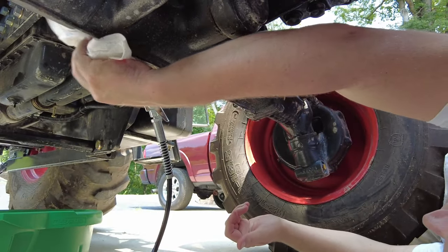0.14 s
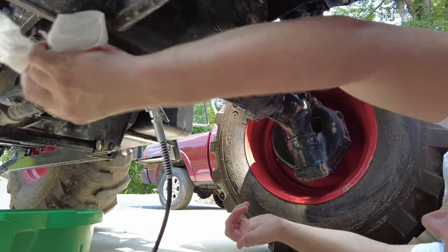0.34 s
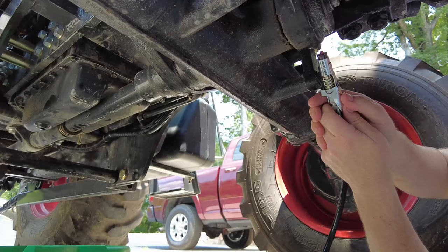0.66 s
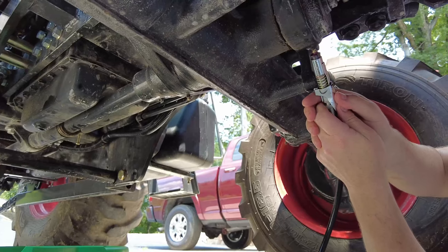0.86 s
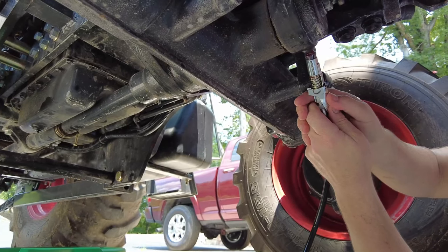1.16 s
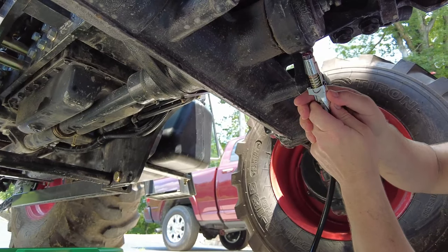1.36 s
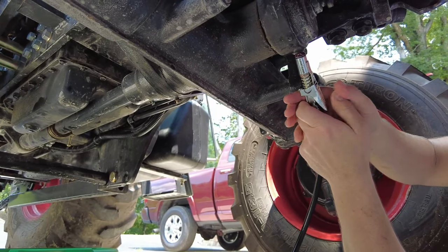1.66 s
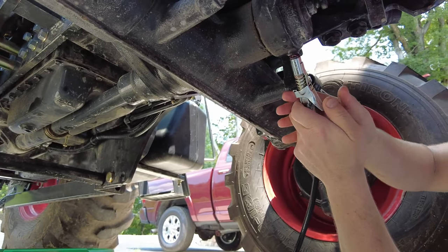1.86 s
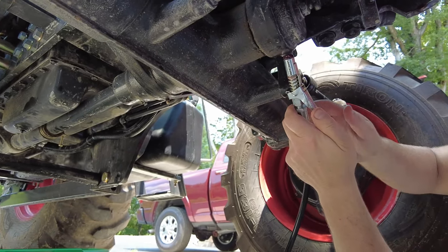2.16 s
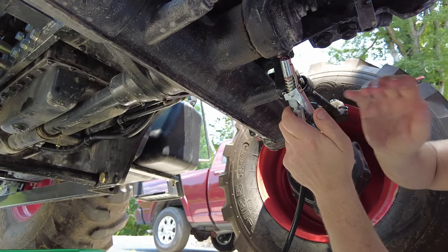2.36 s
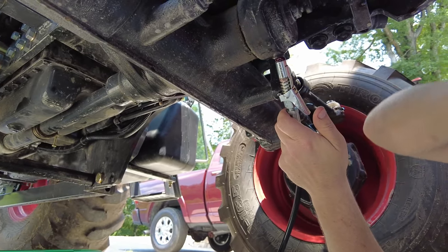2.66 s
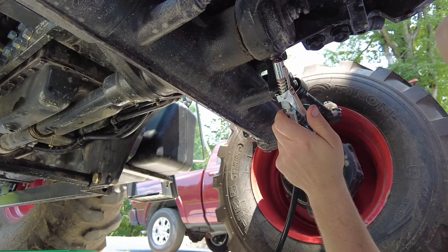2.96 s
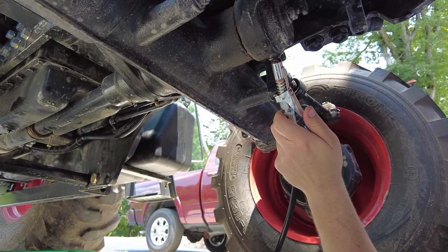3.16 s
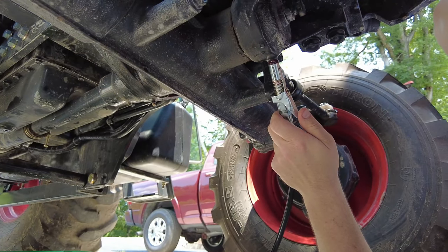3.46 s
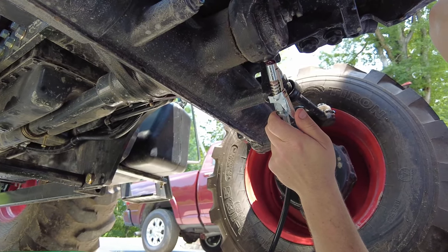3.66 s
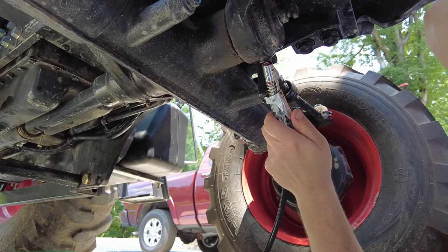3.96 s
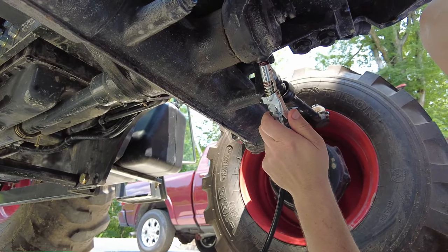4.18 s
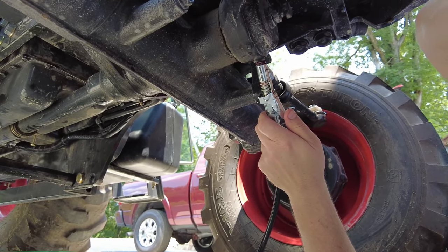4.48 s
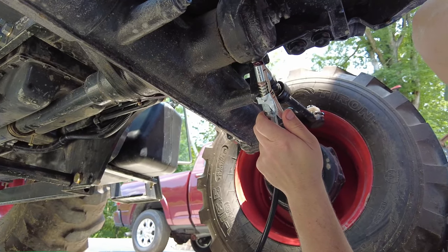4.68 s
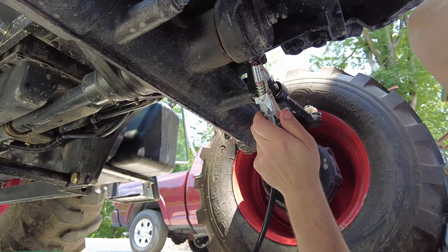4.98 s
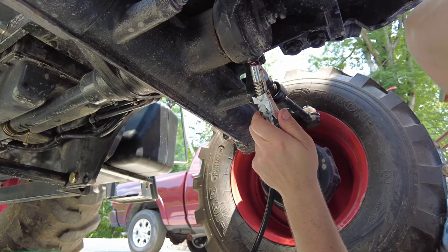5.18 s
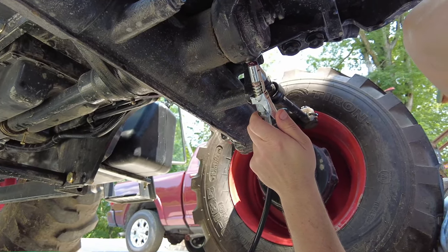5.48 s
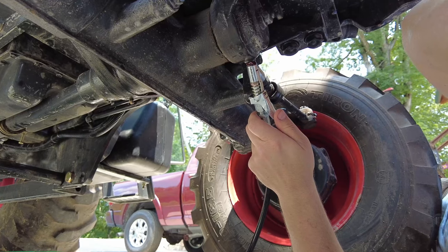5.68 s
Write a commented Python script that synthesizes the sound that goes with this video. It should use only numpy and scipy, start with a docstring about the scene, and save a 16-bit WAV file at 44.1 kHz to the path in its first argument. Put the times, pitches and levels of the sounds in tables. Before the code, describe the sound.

In an open garage with a low, distant rumble, quiet bird chirps and a soft paper wipe give way to small clicks of a steel coupler. Then a trigger clicks and a nearby cordless grease gun whistles and whirs up to speed, knocking lightly as it pumps. The motor coasts down with a brief grinding of gears, and a second pull sends the whine rising again.

```python
"""An open garage, under a tractor, at a microphone with two closely spaced ports. A paper towel wipes the
frame and a bird sings outside; hands snap the coupler of a cordless grease gun onto a nipple. The
trigger is pulled twice: the speed control whistles, the motor winds up and sags under the pump stroke,
coasting down between the pulls. Its whine rides on the rush of gears and fan; the yard rumbles in
the distance."""
import sys
import numpy as np
from scipy import signal
from scipy.fft import rfft, irfft
from scipy.io import wavfile
from scipy.ndimage import uniform_filter1d, map_coordinates

SR = 44100
rng = np.random.default_rng(int(sys.argv[2]) if len(sys.argv) > 2 else 0)


def generate_wav(signal):
    """Clip the signal to [-1, 1] and save it as 16-bit WAV at the path in sys.argv[1]."""
    frames = np.transpose(np.atleast_2d(signal))
    scaled = np.clip(frames, -1, 1) * 32767
    pcm = np.round(scaled).astype(np.int16)
    wavfile.write(sys.argv[1], SR, pcm)


N = 256926
T = np.arange(N) / SR
F = np.maximum(np.arange(N // 2 + 1) * SR / N, 1)

MOTOR_START_S = 3.22
# Motor shaft winding up, coasting, winding up again and sagging under the second pump stroke: t/s, f/Hz
SHAFT_RATE = [(3.22, 5), (3.41, 128), (3.56, 251), (3.68, 318), (3.768, 352.4), (4.51, 354.8), (4.57, 339),
              (4.63, 272), (4.72, 207), (4.85, 166), (5.17, 83), (5.25, 102), (5.4, 197), (5.52, 280),
              (5.64, 326), (5.76, 334), (5.83, 324)]
def motor(first_sag_hz=19.5):
    """The gun under the tractor: its tones and its rush all follow one shaft."""
    hz = curves(SHAFT_RATE)[0] - first_sag_hz * load()
    turns = np.cumsum(hz * (1 + .0005 * walk(40))) / SR
    angle, speed = 2 * np.pi * turns, hz / hz.max()
    rattle = np.clip((1 - speed) / .08, 0, 1)  # the teeth rattle below full speed
    spun_up = np.clip((speed - .3) / .35, 0, 1)  # a slow shaft raises no overtones or growl
    tones = unbalance_hum(angle, speed, rattle)
    tones += gear_mesh(angle, hz, speed, rattle)
    tones += commutator_whine(angle, hz, speed, rattle)
    tones += overtones(angle, hz, speed) * spun_up ** 2
    tones += gearbox_growl(angle, hz, speed, rattle) * np.sqrt(spun_up)
    return tones * gate(MOTOR_START_S, 6) + rush(turns, hz, speed)


def commutator_whine(angle, hz, speed, rattle, bars=12):
    """The commutator bars whine, smothered by the first pump stroke and clearer with the gears slack."""
    roughness_rad = .1 + .55 * rattle * (1 - .75 * slack())
    whine = tone(bars * angle + roughness_rad * walk(110), 1.8 * speed, pan_db=-7.5 * speed ** 8)
    db = -34.8 + resonance(bars * hz, hz=4250, width=90, db=7.7) - 5 * load() + 3 * slack()
    db += (1.5 + 1.5 * rattle) * walk(35)
    return whine * undb(db) * speed ** 1.02 * radiation(bars * hz) * standing_waves(hz)


def gear_mesh(angle, hz, speed, rattle, teeth_per_turn=10.245):
    """Meshing teeth sing; the pump stroke shakes the tone and the overrun makes it flare."""
    mesh_hz = teeth_per_turn * hz
    shake_rad = .1 + .8 * rattle + .54 * load()
    mesh = tone(teeth_per_turn * angle + shake_rad * walk(110), -1.5 - rattle)
    db = -30.5 + resonance(mesh_hz, hz=3406, width=200, db=6) + 20.5 * overrun() - 2 * rattle
    db += 2 * walk(35)
    return mesh * undb(db) * speed ** 2.6 * radiation(mesh_hz) * standing_waves(hz)


def unbalance_hum(angle, speed, rattle):
    """The unbalanced shaft hums once per turn, growing steeply with speed."""
    return tone(angle + .25 * rattle * walk(45), -1.3) * undb(-40.5 + walk(14)) * speed ** 8.8


# Shaft harmonics: multiple of the shaft rate, full-speed level/dB, phase between ports/rad, power of speed
HARMONICS = [(3, -40.5, -1.7, 18), (6, -40, -1.0, 4), (15, -46, 2.5, 6), (24, -38.5, 1.6, 1.8),
             (36, -53, 1, 8), (37, -55, 2, 8), (40, -52, -1, 8), (41, -52, 1.5, 8), (42, -51, 2, 8)]
def overtones(angle, hz, speed):
    """Harmonics of the shaft that sing out near full speed."""
    out = 0
    for multiple, db, spread, power in HARMONICS:
        partial = tone(multiple * angle + .2 * walk(30), spread)
        out += partial * undb(db + 2.2 * walk(18)) * speed ** power * standing_waves(hz)
    return out


# Low gearbox tones: multiple of the shaft rate, base level/dB re the rumble, phase between ports/rad
GROWL_TONES = [(.5, -14, .3), (.68, -15, .3), (1, -11, -.8), (2, -8, 2.4), (2.3, -10, 2.7), (3, -1, -2.7),
               (4, -11, -1.8), (6, -3, -1.6)]
def gearbox_growl(angle, hz, speed, rattle):
    """The loaded gearbox growls through the hollow of its case; the lowest tones swell on the overrun."""
    rumble_db = rush_levels(speed)[0]
    out = 0
    for multiple, db, spread in GROWL_TONES:
        lift_db = resonance(multiple * hz, hz=700, width=160, db=6.8) + (multiple <= 1) * 3.5 * overrun()
        partial = tone(multiple * angle + .5 * walk(45), spread)
        out += partial * undb(rumble_db + db + lift_db + 3 * walk(30)) * standing_waves(hz)
    return out * (.3 + .5 * rattle)


# Spectrum of the rush at the microphone, in phase (mid) and opposed (side): f/Hz, relative level/dB
RUSH_MID_SPECTRUM = [(76, -20), (130, -19.5), (327, -12), (452, -9.5), (761, -18.5), (859, -28.5),
                     (1210, -4.5), (1310, -9.5), (1540, -2), (1920, -3), (2750, 1), (7080, -12.5),
                     (7820, -14.5), (8650, -17.5), (15800, -17)]
RUSH_SIDE_SPECTRUM = [(76, -67), (130, -36), (327, -19), (586, -19.5), (777, -9), (1360, -16.5),
                      (1480, -17.5), (2160, -11), (3300, -1.5), (3650, -6.5), (6030, -13), (7080, -26),
                      (11700, -26), (14600, -21.5), (15800, -49)]
# Resonances and hollows of the casing and the floor: f/Hz, width/Hz, gain/dB
CASING_PEAKS = [(745, 110, 0.5), (1548, 115, 7.5), (1720, 100, 3.5), (1965, 165, -2.5), (2753, 20, 8.5),
                (3304, 103, 6), (4340, 940, 3), (5100, 550, -1.5), (6500, 400, -0.5), (7160, 740, -6),
                (11900, 2200, -6.5), (14600, 1300, 1)]
def rush(turns, hz, speed, grit_per_s=420, grit_db=3, port_lag_s=5 / SR):
    """Gears and fan air, roughened by tooth knocks and coloured by the casing."""
    grit = undb(grit_db * walk(grit_per_s))
    mid, diffuse = (rfft(grit * gear_noise(turns, speed) + 1.44 * rng.standard_normal(N))
                    for _ in range(2))
    # the lag between the ports turns part of the sound into side, a quarter cycle off
    side = 1.05 * diffuse - .7j * np.tanh(3 * np.sin(2 * np.pi * F * port_lag_s)) * mid
    casing = undb(sum(resonance(F, *peak) for peak in CASING_PEAKS))
    mid = irfft(mid * colour(RUSH_MID_SPECTRUM) * casing, N)
    side = irfft(side * colour(RUSH_SIDE_SPECTRUM) * np.where(F > 1000, casing, 1), N)
    pair = ports(unit(mid), undb(3) * unit(side))
    low, high = 1 / (1 + (F / 1100) ** 8), 1 / (1 + (4950 / F) ** 20)
    rumble_db, body_db, hiss_db = rush_levels(speed)
    out = 0
    for band, db in [(low, rumble_db - 5 + .31 * walk(31)),
                     (1 - low - high, body_db - 3.5 + .27 * walk(30)),
                     (high, hiss_db - .3 + .5 * walk(33))]:
        part = shaped(pair, band)
        out += part / np.std(part.mean(0)) * undb(db)
    lean_right = undb([[-.7], [.7]])
    return out * lean_right * np.clip((T - MOTOR_START_S) / .05, 0, 1)


# Casing rumble, body and air hiss: base level/dB, power of speed, change/dB when slack,
# change/dB under the first stroke, change/dB on the overrun
RUSH_BANDS = [(-42.5, 1.17, 0.5, 3, 2.2), (-26.5, 0.82, -3.5, 1, 1.5), (-34, 1.59, -2, 2, 1.5)]
def rush_levels(speed):
    """Rumble, body and hiss in dB: all rise with speed, load and overrun; body and hiss drop when slack."""
    return [db + power * 20 * np.log10(speed) + slack_db * slack() + load_db * load() + over_db * overrun()
            for db, power, slack_db, load_db, over_db in RUSH_BANDS]


def gear_noise(turns, speed, repeat=.69, marks_per_turn=128):
    """Tooth and brush noise partly repeats on every turn, so its grain glides with speed."""
    fresh = rng.standard_normal((int(turns[-1]) + 2, marks_per_turn))
    marks = signal.lfilter([1], [1, -repeat], fresh, axis=0)
    return map_coordinates(unit(marks).ravel(), [turns * marks_per_turn], order=3) * np.sqrt(speed)


def load(peak_s=4.063, length_s=.28):
    """Load of the first pump stroke on the motor, 0-1."""
    return np.cos(np.pi * np.clip((T - peak_s) / length_s, -.5, .5)) ** 2


def slack(take_up_s=.24, run_on_s=.13, let_go_s=.044):
    """How freely the gears run, 0-1: they take up after a press and let go a moment after a release."""
    return 1 - sum(np.clip((T - pressed) / take_up_s, 0, 1)
                   * np.clip(1 - (T - released - run_on_s) / let_go_s, 0, 1)
                   for pressed, _, released, _ in TRIGGER_PULLS)


def overrun(peak_s=.052, end_s=.25):
    """Grinding of the slowing gears after a release, 0-1."""
    return sum(swell(released, released + peak_s, released + end_s) for _, _, released, _ in TRIGGER_PULLS)


def radiation(hz, corner_hz=1520):
    """The small gear case sends out little below its first resonance."""
    return 1 / (1 + (corner_hz / hz) ** 16)


def standing_waves(hz, cell_hz=4, depth_db=5):
    """Nearby reflections put peaks and nulls in a gliding tone; the gain is even at full speed."""
    grid = np.arange(0, 400, cell_hz)
    ripple = np.interp(hz, grid, rng.uniform(-1, 1, len(grid)))
    return undb(depth_db * ripple * np.clip((hz.max() - hz) / 20, 0, 1))


# Trigger pulls: pressed t/s, fully in t/s, released t/s, whistle base level/dB
TRIGGER_PULLS = [(3.219, 3.66, 4.57, -31), (5.145, 5.603, 6.0, -32.5)]
# Whistle partials: multiple of the switching rate, relative level/dB at rest, phase between ports/rad
WHISTLE_TONES = [(1, -0.5, -1.37), (2, -0.5, -1.95), (3, -12, -2.1), (4, -21, -1.3)]
def speed_control(switch_hz=2060, start_duty=.042):
    """Chopped current makes the windings whistle until the trigger is fully in."""
    hz = curves(SHAFT_RATE)[0]
    overtone_fade_db = 49 * hz / hz.max()  # the whistle gets purer as the motor winds up
    gain = 0
    for pressed, full, _, db in TRIGGER_PULLS:
        duty = np.interp(T, [pressed, full], [start_duty, 1])
        gain += undb(db) * np.sin(np.pi * duty) * gate(pressed, full, fade=.013)
    whistle = sum(tone(2 * np.pi * k * switch_hz * T, spread) * undb(db - (k > 1) * overtone_fade_db)
                  for k, db, spread in WHISTLE_TONES)
    return whistle * gain * undb(.37 * walk(22))


# Blows of grip, trigger and pump piston: t/s, level/dB, f/Hz, width/octaves, t60/s, relative ring/dB
GUN_BLOWS = [(2.978, -42, 2300, 0.9, 0.033, 2), (2.9825, -30.5, 2330, 0.4, 0.017, -3.5),
             (3.1165, -50, 2100, 0.31, 0.057, -7), (3.172, -46, 2920, 0.86, 0.034, -6),
             (3.2025, -26, 8800, 0.73, 0.024, -11), (3.2237, -43.5, 1980, 1.1, 0.025, 4.5),
             (4.075, -28.5, 422, 0.35, 0.091, 2), (4.773, -28.5, 2170, 1.1, 0.056, -1),
             (5.1298, -21, 7500, 1.3, 0.013, -28), (5.135, -37.5, 400, 1, 0.066, -11),
             (5.797, -25.5, 493, 0.29, 0.066, -15)]
# Modes of the plastic housing: f/Hz, relative level/dB, t60/s
HOUSING_MODES = [(1550, -4.5, 0.038), (1764, 4.5, 0.035), (1970, -12, 0.048), (2590, -7, 0.062),
                 (3110, -9, 0.037), (5300, -16, .03)]
def gun_knocks():
    """Grip, trigger and piston knock, and the gun's plastic housing rings."""
    return hits(GUN_BLOWS, HOUSING_MODES)


# A last scrape of the paper towel, then clicks of coupler and hose:
# t/s, level/dB, f/Hz, width/octaves, t60/s, relative ring/dB
SCRAPE_AND_CLICKS = [(0.728, -42, 1700, 0.85, 0.025, -35), (0.989, -47, 770, 0.15, 0.074, -50),
                     (1.193, -45, 3860, 0.8, 0.037, -29), (1.201, -47.5, 2780, 1.1, 0.066, -22),
                     (1.879, -46, 6500, 1.4, 0.027, 7), (1.884, -47, 5750, 0.65, 0.021, 6),
                     (1.969, -46, 2000, 1.2, 0.069, -14)]
# Modes of the steel coupler: f/Hz, relative level/dB, t60/s
COUPLER_MODES = [(3190, -20.5, 0.13), (5480, 4.5, .06), (6800, -7, 0.088), (8920, -29, .06),
                 (10500, -15, 0.039), (13500, -11, 0.043), (14300, -5, 0.044)]
def scrape_and_coupler():
    """The towel gives a last scrape; then the steel coupler rings as hands snap it onto the nipple."""
    return hits(SCRAPE_AND_CLICKS, COUPLER_MODES)


def hits(contacts, modes):
    """Each contact is a short burst in its own register; the struck part chatters as it rings."""
    out, t = np.zeros((2, N + SR)), T[:SR // 4]
    f = np.arange(len(t) // 2 + 1) * SR / len(t)
    for start, db, hz, octaves, t60, ring_db in contacts:
        noise = ports(rng.standard_normal(len(t)), 1.33 * rng.standard_normal(len(t)))
        burst = unit(irfft(rfft(noise) * hump(f, hz, octaves), len(t))) * undb(-60 * t / t60)
        chatters = unit(uniform_filter1d(rng.standard_normal((len(modes), 2, len(t))), size=110))
        ring = sum(np.sin(2 * np.pi * mode_hz * t) * (.5 + 1.02 * chatter) * undb(mode_db - 60 * t / decay)
                   for (mode_hz, mode_db, decay), chatter in zip(modes, chatters))
        attack = 1 - np.exp(-t * hz)
        i = int(start * SR)
        out[:, i:i + len(t)] += undb(db) * (burst + undb(ring_db) * ring) * attack
    return out[:, :N]


# Hands, sleeve and towel sliding: start t/s, peak t/s, end t/s, level/dB, f/Hz, width/octaves
SLIDES = [(-.05, 0.148, 0.56, -59.5, 3550, 1.3), (0.296, 0.577, 0.63, -60, 2200, 1.4),
          (0.697, 0.736, 0.728, -45.5, 3130, 1.4), (1.37, 1.41, 1.48, -67, 4000, 1.2),
          (1.65, 1.78, 1.84, -57, 2540, 2.2), (2.845, 2.865, 3.44, -57.5, 5900, 1.44),
          (3.0, 3.146, 3.6, -72, 3000, 1.9)]
def rubs():
    """Skin and paper slide in short, uneven strokes: bands of noise tilted toward the bass."""
    out = 0
    for start, peak, end, db, hz, octaves in SLIDES:
        friction = unit(shaped(rng.standard_normal((2, N)), hump(F, hz, octaves) / F ** .78))
        out += friction * swell(start, peak, end) * undb(db)
    return out * undb(.41 * walk(90))


# Strokes of the paper towel: start t/s, peak t/s, end t/s, level/dB
TOWEL_STROKES = [(-.03, 0.08, 0.51, -62), (.31, 0.573, 0.7, -58.5), (0.683, .725, .745, -50)]
# Resonances of the hollow frame: f/Hz, width/Hz, relative level/dB
FRAME_MODES = [(512, 40, -1.5), (580, 39, -13), (940, 32, -12), (1397, 82, -6.5), (1750, 50, -3)]
def wiping():
    """The towel scrubs the steel frame, which answers with a few hollow resonances."""
    strokes = sum(undb(db) * swell(start, peak, end) for start, peak, end, db in TOWEL_STROKES)
    frame = sum(undb(db) / (1 + (2 * (F - hz) / width) ** 2) for hz, width, db in FRAME_MODES)
    friction = ports(rng.standard_normal(N), .17 * rng.standard_normal(N))
    return unit(shaped(friction, frame)) * strokes * undb(1.1 * walk(30.3))


# Bird notes: t/s, length/s, first f/Hz, middle f/Hz, last f/Hz, level/dB, rasp as a share of the pitch
BIRD_NOTES = [(0.025, 0.039, 3180, 3000, 3800, -48.5, 0.018), (.06, .024, 3530, 3084, 2700, -48.5, 0.033),
              (0.086, 0.028, 3910, 3430, 2900, -51, .03), (0.103, 0.037, 3100, 3570, 3400, -54.5, 0.044),
              (0.204, 0.026, 4400, 3580, 2840, -53.5, .03), (0.247, 0.041, 2530, 3076, 2440, -46, 0.036),
              (0.354, .13, 4170, 3155, 2770, -49, 0.062), (.54, .06, 3440, 3560, 2600, -54.5, 0.046),
              (0.604, 0.099, 2530, 3006, 3120, -48, 0.0063)]
def bird():
    """Outside the garage, a bird warbles in quick, raspy arcs of pitch, smeared by trees and walls."""
    out = 0
    for start, length, first_hz, middle_hz, last_hz, db, rasp in BIRD_NOTES:
        progress = np.clip((T - start) / length, 0, 1)
        arc = np.abs(np.sin(np.pi * progress))
        hz = first_hz + (last_hz - first_hz) * progress + (middle_hz - (first_hz + last_hz) / 2) * arc
        phase = 2 * np.pi * np.cumsum(hz * (1 + rasp * walk(350))) / SR
        out += tone(phase, 1.7) * undb(db) * arc ** .67
    return echo(out, wet_db=-5, t60=.27) * gate(0, .745)


# Spectrum of the yard at the microphone, in phase (mid) and opposed (side): f/Hz, relative level/dB
YARD_MID_SPECTRUM = [(12, -44), (20, 0.5), (65, -3), (95, -9.5), (209, -11), (276, -21), (308, -10.5),
                     (386, -23), (496, -16.5), (539, -22.5), (775, -27.5), (1050, -29.5), (1560, -24),
                     (1950, -32.5), (15800, -57.5)]
YARD_SIDE_SPECTRUM = [(12, -35), (20, -2), (39, -6), (110, -22), (308, -19.5), (397, -20), (496, -16.5),
                      (891, -19.5), (1250, -26), (1740, -29), (2000, -31.5), (4370, -34), (15800, -53)]
def yard():
    """Distant outdoor rumble, much alike at both ports in the bass, with a faint mains hum."""
    mid, side = (unit(shaped(rng.standard_normal(N), colour(spectrum)))
                 for spectrum in (YARD_MID_SPECTRUM, YARD_SIDE_SPECTRUM))
    rumble = ports(mid, undb(-8.5) * side) * undb(-53.5 + .1 * walk(15))
    mains = tone(2 * np.pi * 60 * T, 0) * undb(-61.5)
    return rumble + mains


def echo(x, wet_db, t60):
    """Add the dull, diffuse echo of the surfaces around the microphone."""
    t = T[:SR // 2]
    tail = rng.standard_normal((2, len(t))) * undb(-60 * t / t60) * (t > .003)
    tail = signal.sosfilt(signal.butter(1, 6000, fs=SR, output="sos"), tail)
    tail /= np.sqrt(np.sum(tail ** 2) / 2)
    return x + undb(wet_db) * signal.fftconvolve(x, tail, axes=1)[:, :N]


def ports(mid, side):
    """Left and right microphone ports from their common and opposed parts."""
    return np.array([mid + side, mid - side])


def tone(phase, spread, pan_db=0):
    """A sine, rms 1 when centred, that reaches the left port spread radians ahead."""
    left = np.sin(phase + spread / 2) * undb(pan_db / 2)
    right = np.sin(phase - spread / 2) * undb(-pan_db / 2)
    return np.sqrt(2) * np.array([left, right])


def walk(rate):
    """Smooth random drift of rms 1 that changes about rate times a second."""
    steps = T * rate * 20
    values = signal.fftconvolve(rng.standard_normal(int(steps[-1]) + 40), np.hanning(22), "valid")
    return unit(np.interp(steps, np.arange(len(values)), values))


def curves(rows):
    """The columns of a table, joined by straight lines in time."""
    times, *columns = np.transpose(rows)
    return [np.interp(T, times, column) for column in columns]


def gate(start, end, fade=.0014):
    """One between two times, with short fades."""
    return np.clip((T - start) / fade, 0, 1) * np.clip((end - T) / fade, 0, 1)


def swell(start, peak, end):
    """A gain that rises to one at the peak and falls away."""
    return np.interp(T, [start, peak, end], [0, 1, 0])


def resonance(f, hz, width, db):
    """Lift in dB that a resonance gives at frequency f."""
    return db * np.exp(-(2 * (f - hz) / width) ** 2)


def hump(f, hz, octaves):
    """A bell of gain on a log-frequency axis."""
    return np.exp(-.5 * (np.log2(np.maximum(f, 1) / hz) / octaves) ** 2)


def colour(points):
    """Gain at each frequency from points of f/Hz, level/dB."""
    hz, db = np.transpose(points)
    return undb(np.interp(np.log(F), np.log(hz), db))


def shaped(x, gain):
    """Filter by a gain at each frequency."""
    return irfft(rfft(x) * gain, N)


def undb(db):
    """Decibels to gain."""
    return 10 ** (np.asarray(db) / 20)


def unit(x):
    """Scale to rms 1."""
    return x / np.sqrt(np.mean(x ** 2) + 1e-20)


def scene():
    """Under the tractor, the gun and the handling; beyond the open door, the bird and the yard."""
    handling = echo(scrape_and_coupler() + gun_knocks() + rubs(), wet_db=-13.5, t60=.11)
    return motor() + speed_control() + handling + wiping() + bird() + yard()


def record(dry, top_hz=15900):
    """The camera behind the microphone cuts the top treble steeply."""
    return signal.sosfilt(signal.ellip(10, .2, 80, top_hz, fs=SR, output="sos"), dry)


dry = scene()
out = record(dry)
generate_wav(out)
```